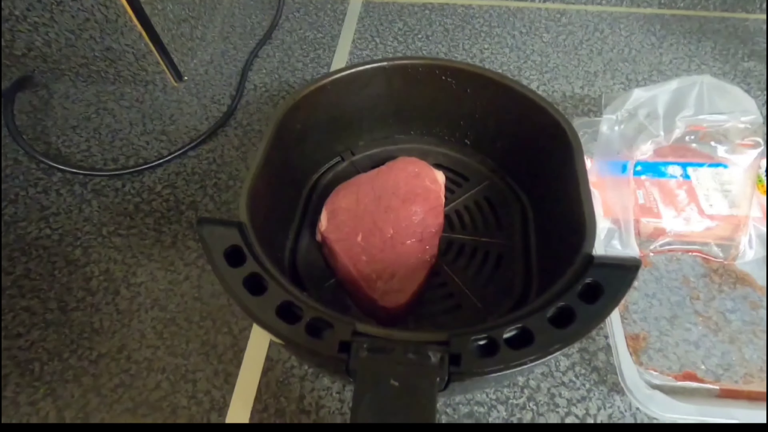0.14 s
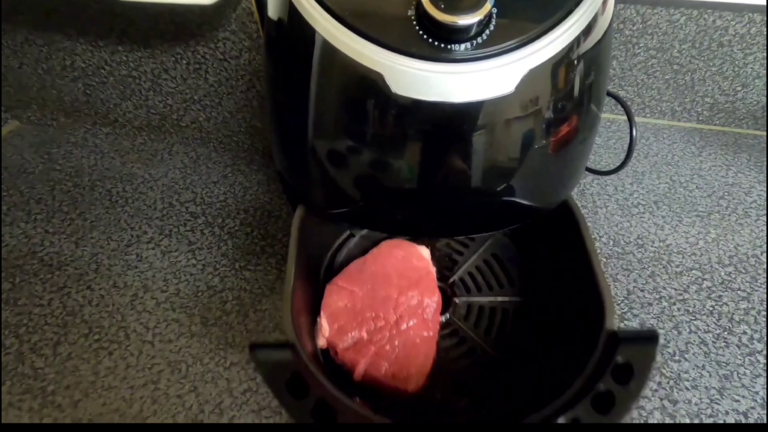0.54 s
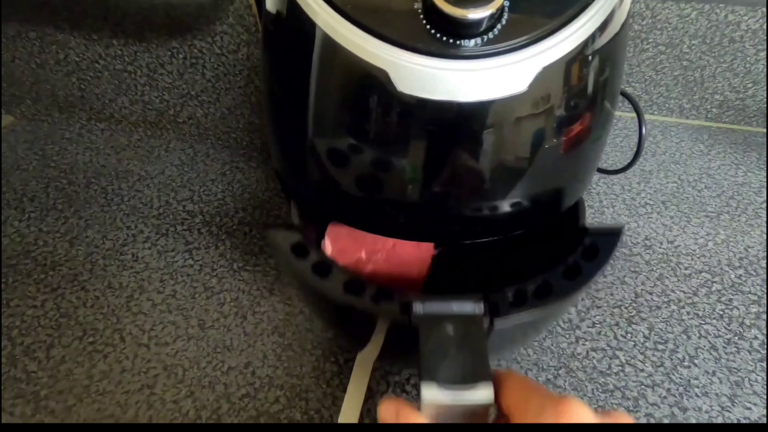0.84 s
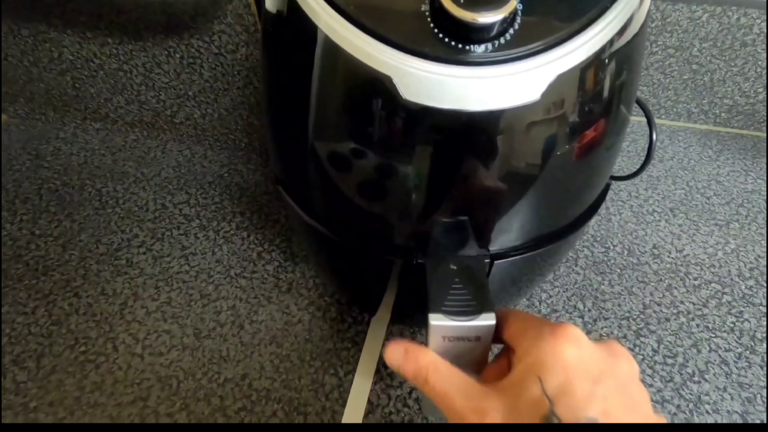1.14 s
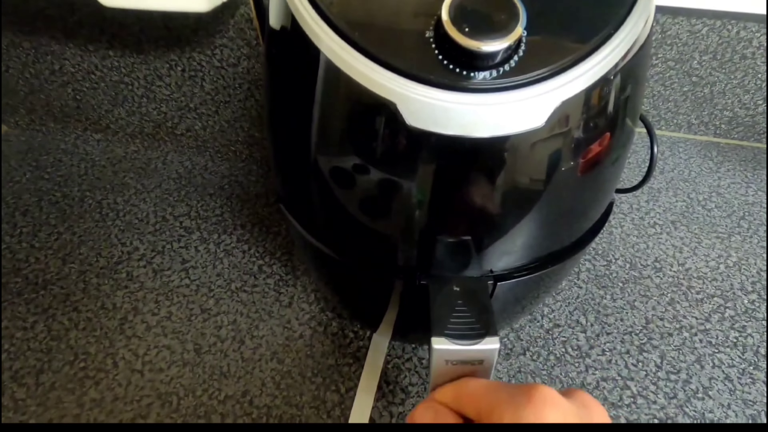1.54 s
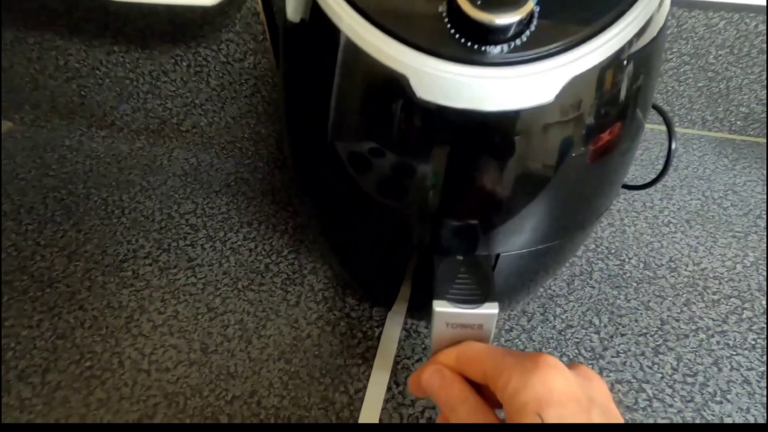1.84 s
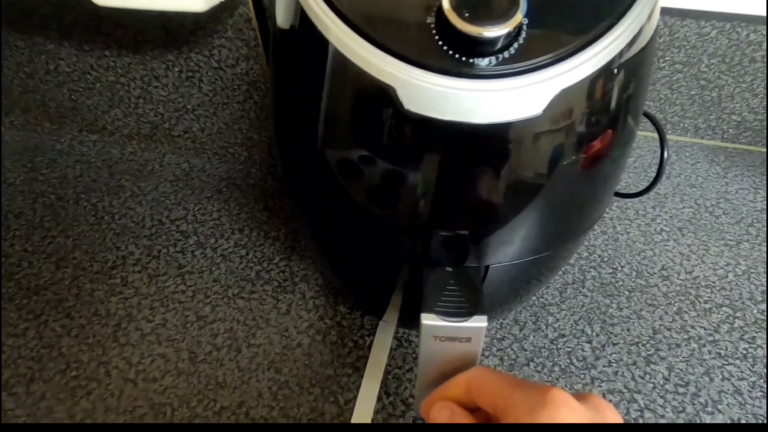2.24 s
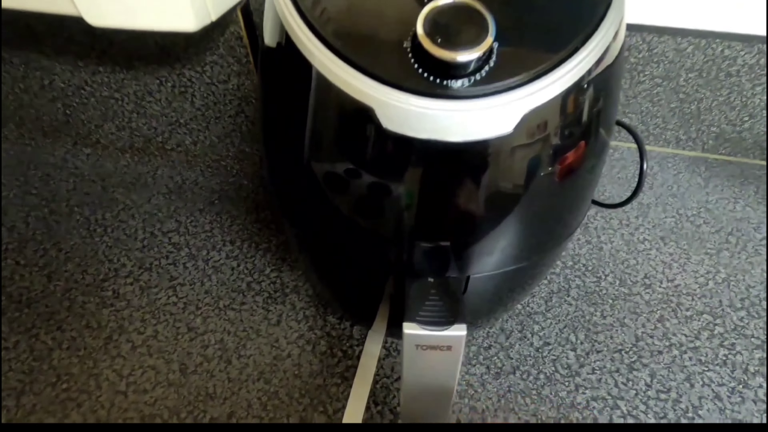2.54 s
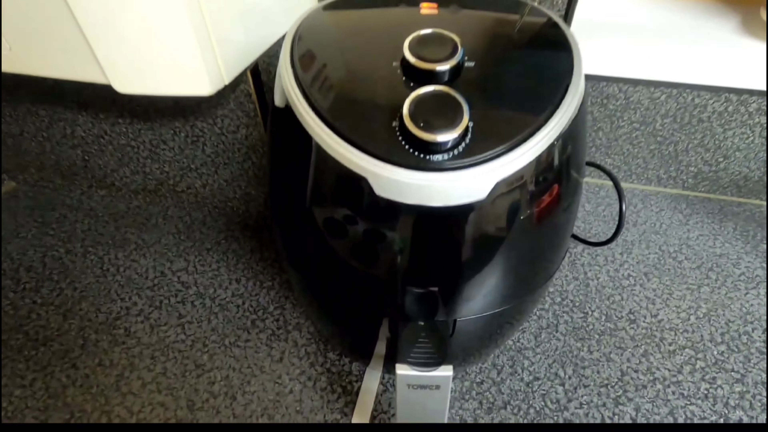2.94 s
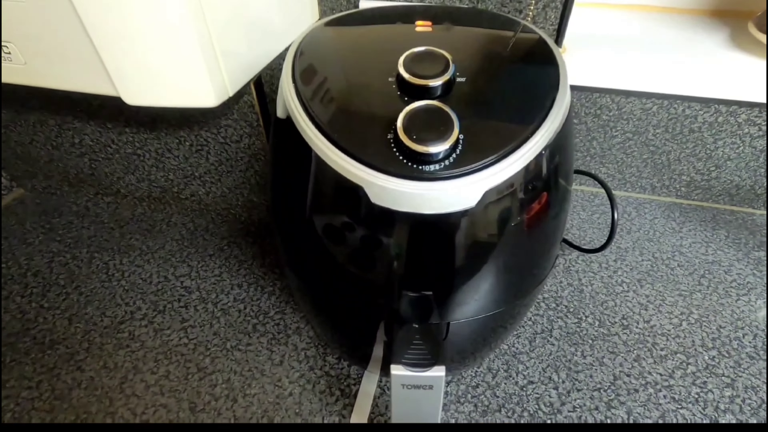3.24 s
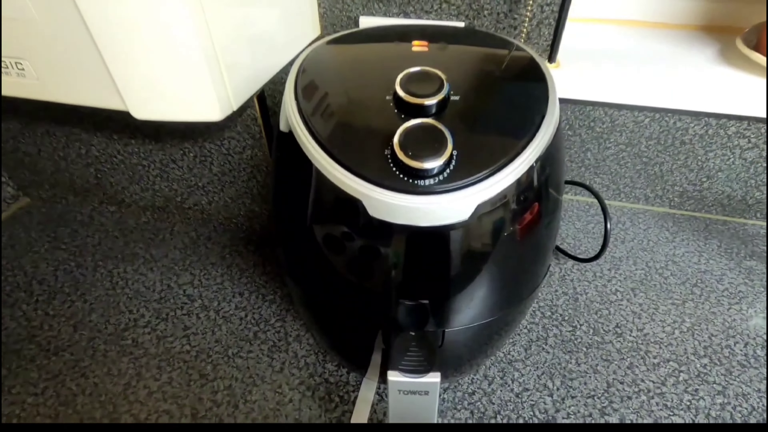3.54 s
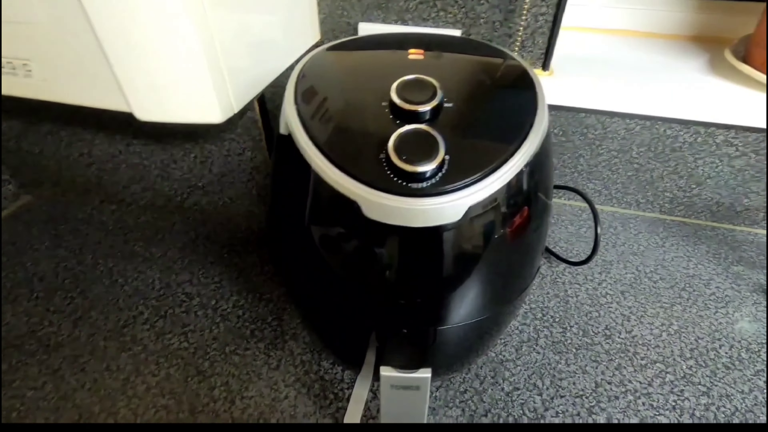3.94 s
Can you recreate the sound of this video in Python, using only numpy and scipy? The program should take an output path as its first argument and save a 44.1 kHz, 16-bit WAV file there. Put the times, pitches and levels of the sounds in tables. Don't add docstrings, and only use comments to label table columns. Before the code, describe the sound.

An air fryer basket scrapes and clatters into its slot, latches with a hard snap, then the fan winds up while a timer ticks.

```python
import sys
import numpy as np
from scipy import signal
from scipy.fft import rfft, irfft, next_fast_len
from scipy.io import wavfile
from scipy.ndimage import uniform_filter1d

SR = 44100
rng = np.random.default_rng(int(sys.argv[2]) if len(sys.argv) > 2 else 0)


def materialize(psi):
    bounded = np.clip(np.atleast_2d(psi).T, -1, 1)
    quanta = np.round(bounded * 32767).astype(np.int16)
    wavfile.write(sys.argv[1], SR, quanta)


def makeup_ratio(level_db):
    decades = np.asarray(level_db, float) / 20
    return 10 ** decades


N = 180226

# frequency in Hz, level in dB per Hz.
RUSTLE_COLOUR = [(150, -28.5), (250, -28), (732, -11), (809, -9.5), (1350, -5.5), (1650, -20),
                 (4020, -14.5), (4900, -29), (8740, -28.5), (13000, -59)]
# frequency in Hz, level in dB.
WHINE = [(1336, 0.5), (2672, -14), (4008, -23)]
# time the full level is reached in seconds, rise before it in s, hold in
# s, rustle in dB, whistle in dB.
RUSTLES = [
    (.005, 0.069, .01, -51.5, -64),
    (.07, 0.11, 0.0069, -54, -50.5),
    (.3, 0.62, 0.01, -58.5, -84),
]
GAP_S = (.417, .485)
# frequency in Hz, level in dB per Hz.
QUIET = [(24, -48.5), (40, -28), (129, -4), (218, -3), (319, -38.5), (405, -33), (890, -27), (1960, -26),
         (2370, -43.5), (5210, -44.5), (12000, -44), (15600, -99), (22000, -120)]
# frequency in Hz, left-right likeness from 0 to 1.
LIKENESS = [(60, 0.98), (180, 0.79), (530, 0.93), (1570, 0.7), (2900, .6), (4650, 0.1), (13800, 0.055)]
# time the full level is reached in
# seconds, rise before it in s, hold in s, deep rumble in dB, boom in dB.
JOLTS = [(.03, 0.96, 0.06, -33.5, -39.5), (.24, 0.33, 0.11, -36, -41), (.53, 0.24, 0.0036, -35.5, -38),
         (.75, 0.28, .01, -38, -34.5), (.822, 0.046, 0.02, -15.5, -51), (1.11, 0.047, 0.022, -40, -17.5),
         (1.16, 0.27, 0.0077, -29, -23), (1.3, 0.039, 0.033, -53, -12.5), (1.37, 0.11, 0.011, -28.5, -21),
         (1.52, 0.33, 0.016, -33.5, -44), (1.86, 0.14, 0.1, -47, -47), (2.065, 0.11, 0.029, -23, -20),
         (2.26, .1, 0.053, -41.5, -58)]
# start in seconds, cavity peak in dB, loudest cavity pitch in Hz, thud in dB.
BOOMS = [(0.232, -30.5, 157, -34), (0.296, -30.5, 132, -39), (0.535, -41, 134, -30.5),
         (0.795, -25, 196, -29), (1.081, -33, 149, -34), (1.118, -26.5, 172, -20), (1.15, -33, 159.8, -26),
         (1.18, -33, 134, -21.5), (1.29, -12, 140, -26.5), (1.309, -5, 140, -24), (1.335, -5, 215, -31),
         (1.363, -14, 234, -21.5), (1.532, -23, 218, -38.5), (1.541, -35.5, 215.5, -38),
         (1.615, -46, 215, -63.5), (1.826, -32.5, 214, -67), (1.874, -44.5, 237, -66),
         (2.048, -16.5, 183, -15), (2.066, -14.5, 193, -27)]
# frequency in Hz, level in dB, t60 in seconds.
CAVITY = [(138.2, -7, 0.23), (198, -2.5, 0.11), (216.5, -2, 0.16), (382, -9.5, 0.15)]
# frequency in Hz, level in dB, t60 in seconds.
THUD = [(55, -5.5, 0.11), (70, 4, 0.16)]
# time the full level is reached in seconds, rise before it in s,
# hold in s, level in dB.
SHAKES = [(.636, .2, 0.0073, -55), (.745, 0.013, 0.017, -30), (.81, 0.13, 0.028, -23.5),
          (.92, 0.12, 0.0041, -33.5), (.99, .1, 0.015, -49), (1.137, 0.026, 0.0037, -29.5),
          (1.335, 0.15, 0.0033, -22.5), (1.5, 0.33, 0.091, -46), (1.84, 0.041, 0.007, -44.5),
          (2.052, 0.015, 0.069, -29.5), (2.2, 0.24, 0.027, -40.5)]
# start in seconds, crack peak in dB, shell level in dB, loudest shell pitch in Hz.
BLOWS = [(0.2944, -53.5, -49.5, 1100), (0.326, -62, -69, 1040), (0.4886, -60, -58, 1274),
         (0.5091, -47.5, -45.5, 1310), (0.622, -59, -42.5, 676), (0.6291, -80, -49.5, 680),
         (0.6844, -60, -43.5, 1160), (0.6974, -39, -44.5, 466), (0.7416, -59, -23, 490),
         (0.7913, -28, -12.5, 605), (0.8014, -28.5, -32, 560), (0.8196, -35, -27, 547),
         (0.834, -37, -30, 567.3), (0.875, -44, -27, 1350), (0.8848, -41, -27, 500), (0.897, -45, -32, 600),
         (1.0715, -55, -27.5, 1150), (1.0786, -32, -19, 520), (1.0888, -45, -20, 626.3),
         (1.0972, -41, -18.5, 594.1), (1.1205, -48, -16.5, 613), (1.1306, -44, -32, 620),
         (1.145, -48.5, -37, 1500), (1.18, -50, -28, 565), (1.2116, -52, -34, 584), (1.21, -61, -37, 2250),
         (1.2885, -47, -18, 1715), (1.289, -27, -19, 468), (1.3099, -50, -17, 540),
         (1.3377, -37, -34.5, 420), (1.3485, -41, -17, 687.1), (1.8213, -53, -52, 520),
         (1.998, -62.5, -38.5, 1960), (2.018, -51, -41, 1640), (2.036, -48, -28, 1200),
         (2.043, -43.5, -25.5, 877), (2.048, -9.5, -19.5, 1530), (2.0573, -31.5, -24.5, 603),
         (2.1124, -48, -37, 579), (2.1288, -48, -37.5, 1210)]
# start in seconds, level in dB.
SHARP = [
    (.7913, -35),
    (1.289, -34.5),
    (1.3377, -30),
    (2.048, -29.5),
    (2.056, -46.5),
]
# frequency in Hz, level in dB, t60 in seconds.
SHELL = [(468, -3, 0.073), (543.4, -2, 0.074), (609, -2.5, 0.055), (658, -11, 0.067), (774, -4.5, 0.051),
         (1001, -1, 0.04), (1160, -4.5, 0.048), (1349, -4, 0.06), (1552, -5, 0.07), (1746, -10.5, 0.071),
         (2006, -8, 0.06), (2310, -14, 0.044), (3030, -10.5, 0.038)]
# frequency in Hz, level in dB, t60 in seconds.
LATCH = [(1519.5, -3.5, .005), (6000, -15, .002)]
# time the full level is reached in seconds, rise before it in s,
# hold in s, shell rattle in dB, grit in dB.
SHOVES = [(.485, .02, 0.22, -58.5, -75.5), (.7, 0.084, 0.0099, -49, -58.5),
          (.738, .015, 0.07696, -42.5, -56), (.8, 0.019, 0.052, -20.5, -36),
          (.96, 0.21, 0.16, -39.5, -46.5), (1.08, 0.056, 0.065, -26, -41.5), (1.15, .1, 0.17, -58, -49),
          (1.289, 0.0033, 0.05, -21, -41.5), (1.35, 0.14, 0.0075, -21, -41),
          (1.825, 0.0092, 0.017, -62.5, -78), (1.885, 0.028, 0.045, -56, -64.5),
          (2.03, 0.14, 0.0092, -45.5, -51), (2.06, 0.0453, 0.11, -32.5, -43)]
SLAMS = [
    (.792, 0.005, 0.0037, -35, -30),
    (1.289, .005, 0.0014, -23, -30.5),
    (1.341, 0.035, 0.0036, -16, -28),
    (2.048, 0.027, 0.0012, -14.5, -25.5),
]
# frequency in Hz, level in dB per Hz.
GRIT = [(530, -42), (900, -5), (1040, -1), (1230, -2), (1800, -5), (2450, -6), (3000, -6), (4110, -7.5),
        (8990, -22.5), (11900, -47.5), (13000, -77.5)]
# time in seconds, peak in dB.
TICKS = [(0.6021, -36.5), (1.1261, -35), (1.6492, -37.5), (2.1744, -51), (2.6985, -40), (3.2236, -37),
         (3.7482, -34.5)]
# time in seconds, peak in dB.
TOCKS = [(0.8694, -59), (1.3894, -55.5), (1.9076, -41.5), (2.4314, -40.5), (2.9562, -39.5), (3.4815, -36),
         (4.0068, -34)]
# seconds after the beat, level in dB.
TICK_STROKES = [
    (-.040, -17),
    (0, 0),
    (.0058, -5),
    (.0088, -7),
    (.0115, -15),
]
# seconds after the beat, level in dB.
TOCK_STROKES = [
    (-.028, -18),
    (-.014, -14),
    (0, 0),
    (.004, -7),
    (.011, -13),
    (.017, -14),
]
# frequency in Hz, level in dB, t60 in seconds.
CLOCKWORK = [(2220, -17, 0.0096), (2970, -7, 0.0081), (4090, -13.5, 0.012), (4950, -30.5, 0.06),
             (5400, -33.5, .04), (5295, -2, 0.0095), (4700, -6, 0.0032), (6689, -17.5, 0.0052)]
# time the full level is reached in seconds, rise before it in s,
# hold in s, level in dB.
HISS_SWELL = [
    (1.02, .12, .06, -69.5),
    (1.16, .1, .09, -71.5),
    (1.3, .03, 0.043, -69),
]
# time the full level is reached in seconds, rise before it in s, hold in s, level
# in dB.
SQUEAK_SWELL = [(1.025, 0.12, 0.073, -54)]
# time the full level is reached in seconds, rise before it in s,
# hold in s, level in dB.
GAP_NOTE_SWELL = [(.96, 0.034, 0.12, -50)]
# frequency in Hz, width in Hz, level in dB.
DRONE = [(147.1, 30, -3), (206.6, 32, 3), (257.3, 33, -4), (386.6, 45, -9.5)]
# frequency in Hz, width in Hz, level in dB.
DUCT = [(818.5, 41, -0.5), (1200, 38, -2.5), (1567, 80, -5.5), (2100, 170, -15), (2830, 52, -10.5),
        (3600, 280, -35)]
# frequency in Hz, level in dB per Hz.
AIR = [(180, -32), (300, -26.5), (388, -6.5), (603, -11), (812, -12.5), (1080, -11.5), (1180, -12),
       (1730, -17), (2920, -21), (3750, -27.5), (4300, -33.5), (5550, -35.5), (9000, -47), (11700, -80),
       (19800, -120)]

RISE_DB = 40
SLAM_FALL_DB_S = 897
STEADY_TOP_HZ = 9150
FAN_ON_S, FAN_RUN_UP_S, FAN_KNEE = 2.33, 1.258, 12
KITCHEN_T60_S, WALL_CUT_HZ = 0.46, 2900
SIGNS = rng.choice([-1, 1], N)


def rms_one(x):
    return x / np.sqrt(np.mean(x ** 2) + 1e-20)


def butter(x, hz, kind, order):
    return signal.sosfilt(signal.butter(order, hz, kind, fs=SR, output="sos"), x)


def at_hz(points, hz):
    points = np.array(points)
    return np.interp(np.log(hz), np.log(points[:, 0]), points[:, 1])


def drift(rate):
    r = np.exp(-80 * np.pi * rate / SR)
    slow = signal.lfilter([1], [1, -2 * r, r * r], rng.standard_normal(N // 40 + 2002))[2000:]
    return np.interp(np.arange(N) / 40, np.arange(len(slow)), rms_one(slow))


def evened(x, span_s):
    span = int(span_s * SR)
    power = uniform_filter1d(uniform_filter1d(x ** 2, span), span)
    return x / np.sqrt(power + 1e-12)


def wobbling(hz, depth, rate):
    phase = 2 * np.pi * np.cumsum(hz * (1 + depth * drift(rate))) / SR
    return np.sqrt(2) * np.sin(phase)


def ring(clicks, hz, t60):
    r, w = makeup_ratio(-60 / (t60 * SR)), 2 * np.pi * hz / SR
    return signal.lfilter([0, np.sin(w)], [1, -2 * r * np.cos(w), r * r], clicks + 1e-18)


def resonant_noise(peaks):
    total = 0
    for hz, width, db in peaks:
        total = total + makeup_ratio(db) * rms_one(ring(rng.standard_normal(N), hz, 5.74 / width))
    return rms_one(total)


def banded_noise(spectrum, patchy_db, tilt_db=0):
    together = drift(2.5)
    edges = 30 * 2 ** np.arange(0, 9.1, 1 / 3)
    white = rng.standard_normal((2, 2, N))
    power, out = 0, 0
    for k, (low, high) in enumerate(zip(edges, edges[1:])):
        hz = np.sqrt(low * high)
        if not spectrum[0][0] < hz < spectrum[-1][0]:
            continue
        band = signal.butter(2, [low, high], "band", fs=SR, output="sos")
        mid, side = signal.sosfilt(band, white[k % 2])
        alike = np.clip(at_hz(LIKENESS, hz), -1, 1)
        level_db = at_hz(spectrum, hz)
        power += makeup_ratio(2 * level_db) * (high - low) * 2 / SR
        flicker_db = patchy_db * (0.85 * together + drift(26.0))
        gain = makeup_ratio(level_db + tilt_db * np.log2(hz / 1000) + flicker_db)
        stereo = np.sqrt(1 + alike) * mid + np.sqrt(1 - alike) * side * [[1], [-1]]
        out = out + gain * stereo / np.sqrt(2)
    return out / np.sqrt(power)


def scuff(times, levels_db, smear_s, shift=0):
    clicks, fade = np.zeros(N), np.exp(-1 / (smear_s * SR + 1e-3))
    np.add.at(clicks, np.round(np.asarray(times) * SR).astype(int), makeup_ratio(levels_db))
    return signal.lfilter([np.sqrt(1 - fade ** 2)], [1, -fade], clicks + 1e-18) * np.roll(SIGNS, shift)


def struck(times, levels_db, modes, spread_db, smear_s, favoured_hz=None, fall_db=0):
    chance = rng.standard_normal((len(times), len(modes)))
    out = np.zeros(N)
    for k, (hz, level_db, t60) in enumerate(modes):
        away = 0
        if favoured_hz is not None:
            away = np.minimum(np.abs(np.log2(hz / favoured_hz)), .9)
        blow_db = levels_db + level_db + spread_db * chance[:, k] - fall_db * away
        out += ring(scuff(times, blow_db, smear_s, shift=977 * k), hz, t60)
    return out


def swells(rows, column, fall_db_s):
    rows, t = np.array(rows)[:, :, None], np.arange(0, N + 32, 32) / SR
    early, late = rows[:, 0] - t, t - rows[:, 0] - rows[:, 2]
    climb_db = RISE_DB * np.maximum(early, 0) / np.abs(rows[:, 1])
    db = rows[:, column] - climb_db - fall_db_s * np.maximum(late, 0)
    return np.interp(np.arange(N) / SR, t, np.maximum(db.max(axis=0), -140))


def push_level(column, fall_db_s):
    return np.maximum(swells(SHOVES, column, fall_db_s), swells(SLAMS, column, SLAM_FALL_DB_S))


def fan_speed():
    ramp = np.maximum(np.arange(N) / SR - FAN_ON_S, 1e-3) / FAN_RUN_UP_S
    return ramp / (1 + ramp ** FAN_KNEE) ** (1 / FAN_KNEE)


def quiet_kitchen():
    return makeup_ratio(-61) * banded_noise(QUIET, patchy_db=-2.5)


def first_shot():
    rustle_db = swells(RUSTLES, column=3, fall_db_s=81)
    whistle_db = swells(RUSTLES, column=4, fall_db_s=253)
    phase = 2 * np.pi * np.cumsum(1 + 0.0055 * drift(20)) / SR
    whine = sum(makeup_ratio(db) * np.sin(hz * phase) for hz, db in WHINE)
    whine = whine * makeup_ratio(-66.5 + 1.3 * drift(14))
    whistle = resonant_noise([(3900, 110, 3.0), (4080, 260, 14), (6563, 1100, -1)])
    whistle = whistle * makeup_ratio(whistle_db - 7.5)
    rustle = makeup_ratio(rustle_db - 6.0) * banded_noise(RUSTLE_COLOUR, patchy_db=0.0)
    before_change = np.arange(N) < np.mean(GAP_S) * SR
    return (whine + whistle + rustle) * before_change


def handling():
    shake_db = 41 * np.log10(fan_speed())
    deep_steady_db = np.maximum(-50 + shake_db, -62)
    boom_steady_db = np.maximum(-33.5 + shake_db, -56)
    deep_db = np.maximum(swells(JOLTS, column=3, fall_db_s=145), deep_steady_db)
    boom_db = np.maximum(swells(JOLTS, column=4, fall_db_s=201), boom_steady_db)
    deep_gain = makeup_ratio(deep_db - 4.5 + 2.2 * drift(4.8))
    boom_gain = makeup_ratio(boom_db - 9.0 + 2.7 * drift(24))
    lumps = butter(butter(rng.standard_normal(N), 32, "high", order=4), 61, "low", order=2)
    deep = makeup_ratio(-6.5) * evened(lumps, span_s=0.12) + makeup_ratio(-5.5) * wobbling(62, depth=.12, rate=11.3)
    boom = resonant_noise([(146.9, 13, -1.5), (215, 110, -6.5), (300, 100, -10.5), (370.2, 55, -11.5)])
    boom = butter(boom, 120, "high", order=2)
    unlike = makeup_ratio(-19) * (deep_gain * rms_one(lumps[::-1]) + 2 * boom_gain * boom[::-1])
    return deep_gain * deep + boom_gain * boom + unlike * [[1], [-1]]


def dull_booms():
    s, cavity_db, cavity_hz, thud_db = np.transpose(BOOMS)
    cavity = struck(s, cavity_db - 2.5, CAVITY, spread_db=0.5, smear_s=0, favoured_hz=cavity_hz, fall_db=18.5)
    thud = struck(s, thud_db - 5.0, THUD, spread_db=1.5, smear_s=0)
    hum = makeup_ratio(swells(SHAKES, column=3, fall_db_s=284) - 2.0) * wobbling(265, depth=0.021, rate=32.1)
    return butter(butter(cavity + thud + hum, 430, "low", order=4), 36, "high", order=2)


def hard_knocks():
    s, crack_db, shell_db, shell_hz = np.transpose(BLOWS)
    snap = scuff(s + 0.0012, crack_db + 11.5, smear_s=0)
    snap += scuff(s, crack_db + 11.0, smear_s=0.00093, shift=19)
    crack = butter(butter(snap, 900, "high", order=2), 2200, "low", order=1)
    crack = butter(crack, 9700, "low", order=12)
    sharp_s, sharp_db = np.transpose(SHARP)
    sharp = scuff(sharp_s + 0.0011, sharp_db, smear_s=0.00076, shift=210)
    crack += butter(sharp, 9000, "high", order=2)
    shell = struck(s + .001, shell_db - 1.5, SHELL, spread_db=4.5, smear_s=0, favoured_hz=shell_hz, fall_db=22.0)
    latch = sum(ring(scuff([2.0486], db, smear_s=0), hz, t60) for hz, db, t60 in LATCH)
    return crack + shell + latch


def shell_rattle():
    sizes = makeup_ratio(2.2 * np.minimum(rng.exponential(1, N), 3)) * SIGNS
    contacts = sizes * (rng.random(N) < 1800 / SR)
    dealt = rng.integers(0, len(SHELL), N)
    rattle = 0
    for k, (hz, db, t60) in enumerate(SHELL):
        rattle = rattle + makeup_ratio(db) * ring(contacts * (dealt == k), hz, .7 * t60)
    return makeup_ratio(push_level(column=3, fall_db_s=177.5) - 6.5) * rms_one(rattle)


def slot_grit():
    grit_db = push_level(column=4, fall_db_s=146.5)
    grit = makeup_ratio(grit_db + 1.5) * banded_noise(GRIT, patchy_db=1.0) * makeup_ratio(1.8 * drift(90))
    return butter(grit, 9900, "low", order=14)


def motor_whine():
    after_change = np.arange(N) > GAP_S[1] * SR
    return makeup_ratio(-82) * resonant_noise([(1980, 25, 0)]) * after_change


def timer():
    beats = []
    for table, strokes in ((TICKS, TICK_STROKES), (TOCKS, TOCK_STROKES)):
        beats += [(s + after, db + more) for s, db in table for after, more in strokes]
    s, level_db = np.transpose(beats)
    rings = struck(s + 0.00055, level_db - 0.5, CLOCKWORK, spread_db=2.0, smear_s=0)
    rings = butter(butter(rings, 2200, "high", order=2), 7900, "low", order=2)
    spit = scuff(s + .0006, level_db + 9.0, smear_s=0.0026, shift=26)
    strokes = np.abs(scuff(s, level_db - 19.5, smear_s=0))
    swelling = signal.fftconvolve(strokes, np.hanning(int(0.03 * SR)), "same")
    hiss = spit + swelling * rng.standard_normal(N)
    return rings + butter(butter(hiss, 3000, "high", order=2), 11300, "low", order=8)


def treble_hiss():
    high_noise = butter(butter(rng.standard_normal((2, N)), 8800, "high", order=8), 14000, "low", order=8)
    return high_noise * makeup_ratio(swells(HISS_SWELL, column=3, fall_db_s=1200) + 14)


def rail_squeak():
    squeak_db = swells(SQUEAK_SWELL, column=3, fall_db_s=219)
    return makeup_ratio(squeak_db + 4.0 + 4.5 * drift(40)) * wobbling(4140, depth=0.01, rate=45)


def air_gap_note():
    note_db = swells(GAP_NOTE_SWELL, column=3, fall_db_s=903)
    note_hz = 534 + 815 * (np.arange(N) / SR - GAP_NOTE_SWELL[0][0])
    note = wobbling(note_hz, depth=0.041, rate=12)
    overtone = 1.1 * wobbling(1.8 * note_hz, depth=0.035, rate=83)
    return makeup_ratio(note_db) * (note + overtone)


def fan_level(full_db, db_per_decade):
    return full_db + db_per_decade * np.log10(fan_speed())


def fan_drone():
    cavity = butter(butter(resonant_noise(DRONE), 110, "high", order=4), 500, "low", order=2)
    cavity = evened(cavity, span_s=0.19)
    cavity = makeup_ratio(fan_level(-32.5, 27) - 4.5 + 1.5 * drift(5.4)) * cavity
    duct = makeup_ratio(fan_level(-45, 54) - 7.0) * butter(resonant_noise(DUCT), 540, "high", order=2)
    return cavity + duct


def fan_rush():
    tilt_db = 0.07 - 6.5 * (1 - fan_speed())
    return makeup_ratio(fan_level(-45, 54)) * banded_noise(AIR, patchy_db=1.0, tilt_db=tilt_db)


def kitchen(x):
    t, size = np.arange(int(.8 * SR)) / SR, next_fast_len(N + SR)
    noise = rng.standard_normal((3, len(t)))
    noise = noise[:2] + 1.44 * noise[2]
    dull = butter(noise, WALL_CUT_HZ, "low", order=1)
    tail = dull * makeup_ratio(-60 * t / KITCHEN_T60_S)
    tail += (noise - dull) * makeup_ratio(-60 * t / (0.23 * KITCHEN_T60_S))
    tail *= np.clip((t - .003) / 0.016, 0, 1) / np.sqrt(SR * 0.07)
    sent = butter(x, 380, "high", order=1)
    return irfft(rfft(tail, size) * rfft(sent, size), size)[:, :N]


def placed(x, lag, pan_db):
    late = np.interp(np.arange(N) - lag, np.arange(N), x)
    return np.array([late * makeup_ratio(pan_db / 2), x * makeup_ratio(-pan_db / 2)])


def scene():
    booms, knocks, ticks, drone = dull_booms(), hard_knocks(), timer(), fan_drone()
    swelling = shell_rattle() + rail_squeak() + air_gap_note()
    body = butter(booms + swelling + drone + motor_whine(), STEADY_TOP_HZ, "low", order=12)
    near = placed(body, lag=2.5, pan_db=0.2)
    near += placed(knocks, lag=0.72, pan_db=-2.0)
    near += placed(ticks, lag=2.35, pan_db=-3.5)
    sent = makeup_ratio(-7.5) * knocks + makeup_ratio(-12.5) * (swelling + booms) + makeup_ratio(-4.0) * ticks + makeup_ratio(-6.5) * drone
    echo = butter(kitchen(sent), 10000, "low", order=10)
    steady = butter(fan_rush() + quiet_kitchen() + handling(), STEADY_TOP_HZ, "low", order=18)
    return near + echo + slot_grit() + treble_hiss() + steady + first_shot()


def top_cut(x):
    return signal.sosfilt(signal.butter(12, 14170, fs=SR, output="sos"), x)


def record(dry):
    t = np.arange(N) / SR
    fade_s = .002
    open_gain = np.clip(np.maximum(GAP_S[0] - t, t - GAP_S[1]) / fade_s + 1, 0, 1)
    dregs = signal.sosfiltfilt(signal.butter(2, 40, fs=SR, output="sos"), dry) * makeup_ratio(-9)
    x = open_gain * butter(dry, 12000, "low", order=2) + (1 - open_gain) * dregs
    return top_cut(np.tanh(x / 0.85))


dry = scene()
out = record(dry)
materialize(out)
```